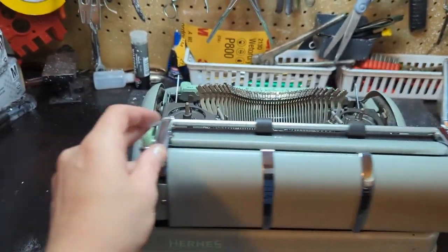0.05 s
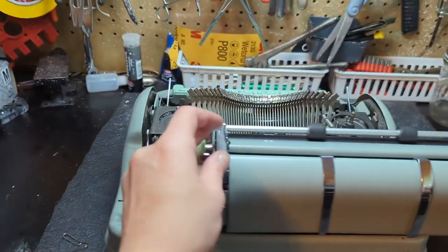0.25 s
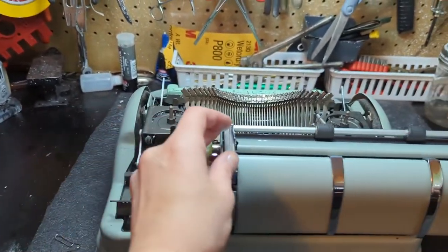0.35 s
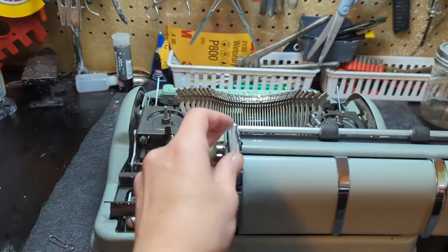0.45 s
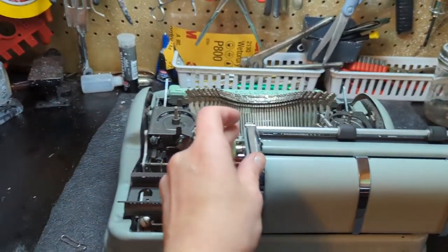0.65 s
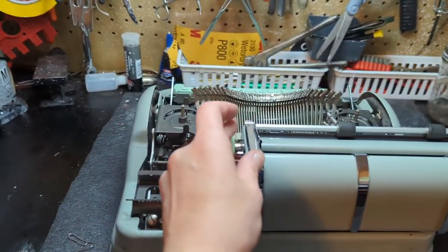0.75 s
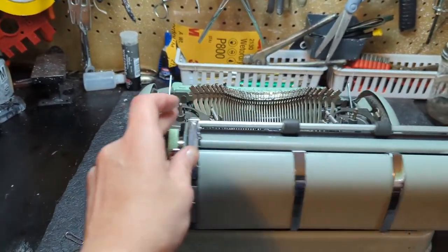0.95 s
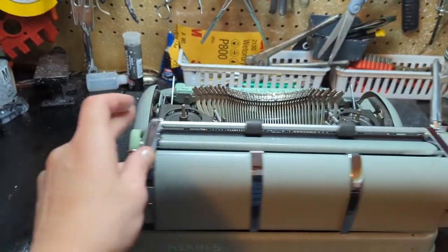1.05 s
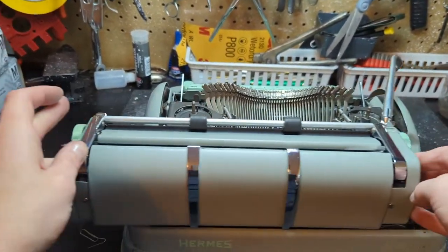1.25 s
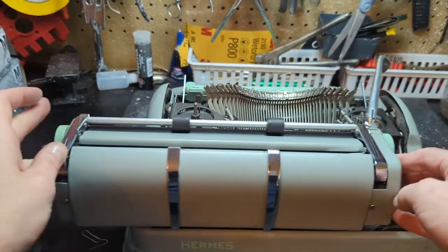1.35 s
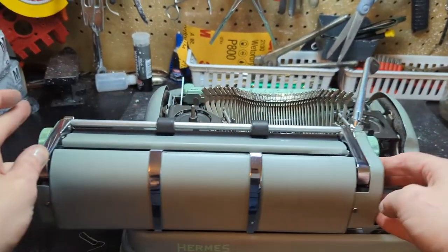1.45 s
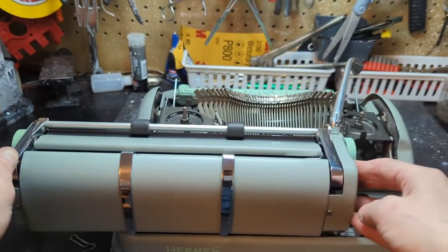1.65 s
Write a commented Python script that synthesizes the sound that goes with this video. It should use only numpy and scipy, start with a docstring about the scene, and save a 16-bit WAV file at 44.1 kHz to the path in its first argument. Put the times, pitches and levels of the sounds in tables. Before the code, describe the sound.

A typewriter carriage slides with ratcheting and clacks, rings its bell once, then slides back.

```python
"""A typewriter carriage is pushed along its rail by hand, close up on a workshop bench.
First it whirrs over the ratchet and clacks past its catches, with a hollow knock at the first.
Then it hits the end: the machine rocks and a hammer strikes the margin bell once.
Last it is slid back, a small spring pings, and it coasts to rest while the bell dies away."""
import sys
import numpy as np
from scipy import signal
from scipy.fft import rfft, irfft
from scipy.io import wavfile
from scipy.ndimage import uniform_filter1d, map_coordinates

SR = 44100
rng = np.random.default_rng(int(sys.argv[2]) if len(sys.argv) > 2 else 0)


def transcribe(u):
    """Save the signal u as a 16-bit wav file named by the first command-line argument.

    u: samples, shape (n,) or (channels, n), limited to [-1, 1]; the rate is SR.
    q: integer samples, one column per channel.
    """
    v = np.clip(np.atleast_2d(u).T, -1, 1)
    q = np.round(v * 32767).astype(np.int16)
    wavfile.write(sys.argv[1], SR, q)


N = 74970
T = np.arange(N) / SR
HZ = np.maximum(np.fft.rfftfreq(N, 1 / SR), 1)

# how wide noise sounds between the ears: pitch_hz, side_minus_mid_db
STEREO_WIDTH = [(60, -12.5), (140, -17.5), (300, -15), (600, -7), (1200, -1.5), (2500, -1), (7000, 0),
                (14000, -2)]
# a colour says how strong low and high pitches are in a noise: pitch_hz, relative_db
ROOM_COLOUR = [(25, -11), (45, 1.5), (68, 3), (100, 1.5), (160, 0.5), (230, -9.5), (480, -1.5), (1000, -13),
               (2500, -13.5), (6000, -38), (15000, -32)]
RUMBLE_COLOUR = [(40, -22), (70, -14), (105, -25), (165, -2), (225, -20), (305, -8.5), (380, -19),
                 (480, -9.5), (900, -64), (3000, -78.5)]
OUT_COLOUR = [(100, -13), (300, -5.5), (600, -13.5), (850, -3), (2200, -3), (3600, -6.5), (4550, -10),
              (5200, -8.5), (7000, -11), (10000, -18.5), (15000, -18)]
BACK_COLOUR = [(100, -18), (300, -1.5), (600, -5), (900, 0.5), (1400, -2.5), (1900, 3.5), (2400, -2),
               (3200, 0), (5000, -6), (6300, -4), (7500, -6.5), (10000, -16), (15000, -14)]
CLACK_COLOUR = [(60, -35), (250, -15), (550, -12), (850, 1), (1500, 4.5), (2800, 4.5), (5000, 2),
                (7200, 4.5), (10500, -7), (14500, 2)]
# the case drumming as the carriage rolls: time_s, level_db
RUMBLE_LEVEL = [(0, -64.5), (.3, -60.5), (.37, -66), (.53, -68), (.9, -65), (1.0, -63), (1.2, -60),
                (1.42, -63), (1.58, -64), (1.66, -81)]
# bumps under the rollers: start_s, gain_db
BUMPS = [(.008, -52), (0.104, -51), (.222, -54.5), (.41, -47), (.805, -59), (.962, -49.5), (1.007, -53),
         (1.094, -57), (1.179, -50.5), (1.315, -54.5), (1.395, -54), (1.555, -63.5)]
# tones of struck parts (a fade is the time to drop 60 dB): pitch_hz, level_db, fade_s
CASE_BOOM = [(74, -14.5, 0.13), (164.8, 0, 0.13), (305, -8, 0.053)]
SHELL_KNOCK = [(807, -32, .065), (925, -35, .06), (1055, -40, .052), (1567, -41, .07), (1855, -38, .04)]
BENCH_JOLT = [(70.4, -52.5, .4), (111.4, -57, .15), (170, -50.5, 0.22), (315, -49, 0.12), (495, -55, .12),
              (749, -48.5, .05), (924, -62.5, 0.2), (1370, -45.5, 0.12)]
SPRING_PING = [(6960, -46, 0.035), (13350, -45, .1)]
# where the frame and carriage shell like to ring: pitch_hz
FRAME_HZ = [167, 301, 445, 597, 795, 941, 1055, 1560, 1856, 2200, 3044, 3166, 4300, 6170, 7025]
# the peak at each of those pitches: width_hz, boost_db
FRAME_PEAKS = [(30, 10.5), (35, 11.5), (45, 11), (40, 13.5), (60, 9.5), (60, 9.5), (55, 6), (80, 2),
               (100, 5), (80, 1.5), (80, 1.5), (50, 6), (120, 5.5), (250, 4), (120, 8)]
# the rail singing (pan above 0 is left): start_s, length_s, first_hz, last_hz, level_db, pan_db
RAIL_TONES = [(0, .2, 4740, 4200, -51.5, -2), (1.03, .13, 6050, 6390, -55, 1)]
# the carriage running out and back: time_s, level_db
RUN_OUT = [(0, -44.5), (.11, -47), (.19, -50.5), (.25, -49), (.30, -53), (.36, -55.5), (.46, -60),
           (.55, -57.5), (.7, -66)]
RUN_BACK = [(.72, -66), (.83, -62.5), (.93, -52.5), (.99, -49.5), (1.08, -49.5), (1.19, -49.5),
            (1.28, -54.5), (1.38, -59.5), (1.47, -66.5), (1.7, -73.5)]
# the carriage hitting its catches:
# start_s, level_db, bass_db, treble_db, attack_s, decay_s, pan_db, part_pitch_hz, part_boost_db
CLACKS = [(0.01, -41, -12, -10, 0.0016, 0.011, 0, 6170, 2.5),
          (.2030, -21, 0.5, 11, 0.00092, 0.0053, -2, 3650, 4.5),
          (0.234, -34, 5, 11, 0.0016, 0.004, 0, 1860, 21), (0.242, -38, 4, 10, 0.0014, .005, -7, 1600, 19),
          (0.26, -30.5, 6, 5.5, 0.0012, 0.004, 3, 7260, 7.5),
          (.376, -48, 6, -8, 0.0041, 0.0076, 3, 6300, 7), (0.4002, -30, 1, -11, 0.0032, .0063, 2, 3350, 3),
          (0.4203, -40, 10.5, -22, 0.0019, 0.0069, 3, 6600, 14.5),
          (0.507, -40.5, -4.5, -16, 0.0019, 0.008, 0.5, 3400, -2),
          (0.564, -21.5, 1, 4.5, 0.0062, 0.0066, 3, 7600, 7.5),
          (.716, -54, 15, -4, .003, 0.0038, 0, 1290, 4),
          (0.866, -50.5, 10, -12, 0.0023, 0.008, -2, 900, -6),
          (.9497, -33, -4, -1, .0022, 0.0086, 1, 3500, -4),
          (1.166, -40, -2.5, -10, 0.0042, 0.013, -3, 3500, -16),
          (1.323, -47.5, 14, -6, 0.0033, 0.004, 4, 1700, 7)]
# the bell's tones: pitch_hz
BELL_HZ = [2638.3, 2754, 6086, 10326, 15350, 15472]
# how each tone rings: delay_s, lasting_db, lasting_fade_s, early_db, early_fade_s, attack_s
BELL_TONES = [(0, -31, 2.2, -29, .5, .008), (0, -47, .55, -52, .2, .0044), (0, -31, .8, -17.5, .18, .002),
              (0, -38, .76, -25, .044, .0008), (0, -56, .3, -30, .06, .0018),
              (.014, -55, .4, -33, .12, .003)]
# as the bell travels, its tones swell, dip and swing sideways: time_s, swell_db, pan_db, right_lag_rad
HUM_SWING = [(.585, -0.5, -11, 2.1), (.66, -2, -8.5, 2.4), (.81, -1, -20, 2.6), (.87, -2, -5, 5.15),
             (.95, 0, 2, 5.2), (1.055, -1.5, -4.5, 7.4), (1.12, -2, 7, 4.9), (1.2, 4, 4.5, 3.8),
             (1.27, 2.5, 10, 2.8), (1.35, 0, 16, 4.9), (1.68, 4.8, 1, 5.3)]
RING_SWING = [(.578, -1.5, 13, 4.2), (.61, -1, 10, 4), (.63, -3, 16, 5.3), (.655, 3.7, 15, 3.9),
              (.69, -3, 5, 4.6), (.73, -3, -2, 8.36), (.77, 4, -3, 8.7), (.83, 10.5, 3, 8.77),
              (.87, 9, 3.5, 9.5), (.95, 0, -5, 10.7)]
SHIMMER_SWING = [(.573, -1, -8, 1), (.585, -7, -3, 5), (.605, 1, 7, 3.5), (.635, 2.5, -20, 3.5),
                 (.66, 2, -4, -2), (.71, 2, -13.5, -1), (.815, -1, -5, 0.1), (.865, 4.5, -1, -2.5),
                 (.92, 2, 4, -1.5)]
FAINT_SWING = [(.59, 0, -8, 0.91), (.68, 0.0018, 0, .9)]

# many small parts add little random peaks and dips to the treble
SMALL_PARTS_DB = 2.2 * np.interp(HZ, np.arange(500) * 45, rng.standard_normal(500))
SMALL_PARTS_DB *= np.clip(HZ / 1500 - .5, 0, 1)
TEETH_PER_S, FULL_SPEED_DB, DB_PER_TENFOLD_SPEED = 148, -45.5, 57.5   # a louder run ticks faster
TICK_DECAY_S, TICK_SPREAD_DB, RUB_SHARE = .0076, 1.5, .5
BASS_HZ, TREBLE_HZ, CLACK_HOLD_S, RATTLE_DB = 1320, 8100, .0035, 2.5
TAIL_DB, TAIL_DECAY_S, TAIL_DULL_HZ = -8.5, .03, 6000
LEFT_RIGHT = np.array([[.5], [-.5]])   # shares a difference between the two sides


def from_db(db):
    """Turn decibels into a number to multiply by."""
    return 10 ** (np.asarray(db) / 20)


def rms_one(x):
    """Scale a signal to an average power of one."""
    return x / np.sqrt(np.mean(x ** 2) + 1e-20)


def since(start):
    """Seconds since a moment, zero before it."""
    return np.maximum(T - start, 0)


def over_time(rows):
    """Join points in time with straight lines."""
    return np.interp(T, *np.transpose(rows))


def over_pitch(points):
    """Join points into a curve from low pitch to high."""
    hz, db = np.transpose(points)
    return np.interp(np.log(HZ), np.log(hz), db)


def panned(pan_db):
    """Place a sound left or right, keeping its power."""
    gains = from_db(LEFT_RIGHT * pan_db)
    return gains / np.sqrt(np.mean(gains ** 2, axis=0))


def noise(colour_db):
    """Stereo noise of a given colour, narrow in the bass and wide in the treble."""
    mid, side = rfft(rng.standard_normal((2, N))) * from_db(colour_db)
    side = side * from_db(over_pitch(STEREO_WIDTH))
    return rms_one(irfft(np.array([mid + side, mid - side]), N))


def flutter(samples):
    """A random wobble; more samples make it slower."""
    return rms_one(uniform_filter1d(rng.standard_normal(N), samples))


def peak(hz, width_hz, db):
    """A boost in dB around a pitch where a part likes to ring."""
    return db / (1 + (2 * (HZ - hz) / width_hz) ** 2)


def frame_db():
    """The frame and its small parts colour the sounds that shake them."""
    return sum(peak(hz, width, db) for hz, (width, db) in zip(FRAME_HZ, FRAME_PEAKS)) + SMALL_PARTS_DB


def room(level_db):
    """The quiet room makes a steady, low noise."""
    return from_db(level_db) * noise(over_pitch(ROOM_COLOUR))


def struck_part(tones, start_s, swell_s, pan_db):
    """A blow sets a part ringing: its tones swell and die away, a little unsteadily."""
    t, fading_s = since(start_s), since(start_s + swell_s)
    ringing = 0
    for hz, db, fade_s in tones:
        ringing += from_db(db - 60 * fading_s / fade_s) * np.sin(2 * np.pi * (hz * t + rng.random()))
    unsteady = from_db(2.5 * flutter(samples=200))
    return np.minimum(t / swell_s, 1) * ringing * unsteady * panned(pan_db)


def rollers():
    """The case drums softly as the carriage rolls, and booms at each bump."""
    rumble = from_db(over_time(RUMBLE_LEVEL)) * noise(over_pitch(RUMBLE_COLOUR))
    booms = sum(from_db(db) * struck_part(CASE_BOOM, s, swell_s=.016, pan_db=-.5) for s, db in BUMPS)
    return rumble + booms


def singing_rail():
    """On the faster stretches, rubbing makes rough tones that swell, glide and fade."""
    out = 0
    for start_s, length_s, first_hz, last_hz, db, pan_db in RAIL_TONES:
        progress = np.clip(since(start_s) / length_s, 0, 1)
        pitch_hz = first_hz + (last_hz - first_hz) * progress
        tone = np.exp(2j * np.pi * np.cumsum(pitch_hz) / SR)
        # two wobbles for each ear roughen the tone
        wobbles = uniform_filter1d([flutter(samples=90) for _ in range(4)], 90)
        rough = wobbles[::2] + 1j * wobbles[1::2]
        swell = np.sqrt(4 * progress * (1 - progress))
        out += from_db(db) * swell * rms_one((rough * tone).real) * panned(pan_db)
    return out


def wander(sound, depth=.012, drift_s=.09):
    """The pitch drifts a little as the carriage shifts its weight along the rail."""
    place = np.cumsum(1 + depth * flutter(samples=int(drift_s * SR)))
    return np.array([map_coordinates(side, [place], order=3, mode="mirror") for side in sound])


def carriage_slide(run, colour, gain_db):
    """The rail rubs and a small lever ticks over the ratchet's teeth; both shake the frame."""
    level_db = over_time(run)
    speed = 10 ** ((level_db - FULL_SPEED_DB) / DB_PER_TENFOLD_SPEED)
    teeth_passed = np.cumsum(TEETH_PER_S * speed * (1 + .15 * flutter(samples=300))) / SR
    new_tooth = np.diff(np.floor(teeth_passed), prepend=0) > 0
    ticks = new_tooth * from_db(TICK_SPREAD_DB * np.clip(rng.standard_normal(N), -2, 2))
    tick_power = signal.lfilter([1], [1, -np.exp(-2 / (TICK_DECAY_S * SR))], ticks + 1e-18)
    tick_power /= TEETH_PER_S * TICK_DECAY_S / 2   # averages about one at full speed
    whirr = np.sqrt(RUB_SHARE + (1 - RUB_SHARE) * tick_power)
    fade_in = np.clip((T - run[0][0]) / .02 + 1, 0, 1)
    fade_out = np.clip((run[-1][0] - T) / .02 + 1, 0, 1)
    frame_noise = wander(noise(over_pitch(colour) + frame_db()))
    return fade_in * fade_out * from_db(level_db + gain_db) * whirr * frame_noise


def clacks():
    """Each catch chatters briefly; loose parts and the room ring on in a duller tail."""
    body_db = over_pitch(CLACK_COLOUR) + frame_db()
    bass = 1 / (1 + (HZ / BASS_HZ) ** 4)
    treble = 1 / (1 + (TREBLE_HZ / HZ) ** 4)
    dulling_db = 10 * np.log10(1 + (HZ / TAIL_DULL_HZ) ** 2)
    out = 0
    for start_s, db, bass_db, treble_db, attack_s, decay_s, pan_db, part_hz, part_db in CLACKS:
        t = since(start_s)
        colour_db = body_db + bass_db * bass + treble_db * treble + peak(part_hz, part_hz / 2.7, part_db)
        rattle = from_db(RATTLE_DB * flutter(samples=40))
        crack = np.exp(-since(start_s + CLACK_HOLD_S) / decay_s) * rattle * noise(colour_db)
        tail = from_db(TAIL_DB) * np.exp(-t / TAIL_DECAY_S) * noise(colour_db - dulling_db)
        out += from_db(db) * np.minimum(t / attack_s, 1) * (crack * panned(pan_db) + tail)
    return out


def bell(start_s):
    """One hammer stroke: each tone drops quickly, then sings on, wavering as the carriage moves."""
    swings = [HUM_SWING, FAINT_SWING, RING_SWING, SHIMMER_SWING, FAINT_SWING, FAINT_SWING]
    out = 0
    for hz, row, swing in zip(BELL_HZ, BELL_TONES, swings):
        delay_s, lasting_db, lasting_fade_s, early_db, early_fade_s, attack_s = row
        t = since(start_s + delay_s)
        times, *columns = np.transpose(swing)
        swell_db, pan_db, lag_rad = (np.interp(T, times, column) for column in columns)
        early = from_db(early_db - 60 * t / early_fade_s)
        lasting = from_db(lasting_db - 60 * t / lasting_fade_s)
        level = np.minimum(t / attack_s, 1) * (early + lasting) * from_db(swell_db)
        out += level * panned(pan_db) * np.sin(2 * np.pi * hz * t + LEFT_RIGHT * lag_rad)
    return out


def scene():
    """Add up the room, the moving carriage, the parts it shakes and the bell."""
    run_out = carriage_slide(RUN_OUT, OUT_COLOUR, gain_db=1)
    run_back = carriage_slide(RUN_BACK, BACK_COLOUR, gain_db=4)
    rolling = rollers()
    knock = struck_part(SHELL_KNOCK, start_s=.205, swell_s=.0044, pan_db=-5)
    jolt = struck_part(BENCH_JOLT, start_s=.587, swell_s=.0092, pan_db=2)
    ping = struck_part(SPRING_PING, start_s=.953, swell_s=.003, pan_db=1)
    carriage = run_out + run_back + rolling + singing_rail() + clacks()
    return carriage + knock + jolt + ping + bell(start_s=.568) + room(level_db=-63)


def record(dry):
    """Deep rumble below 45 Hz is cut away; the treble above 15700 Hz is cut steeply."""
    bass_cut = signal.butter(3, 45, "high", fs=SR, output="sos")
    treble_cut = signal.ellip(10, .3, 70, 15700, fs=SR, output="sos")
    return signal.sosfilt(treble_cut, signal.sosfilt(bass_cut, dry))


dry = scene()
out = record(dry)
transcribe(out)
```